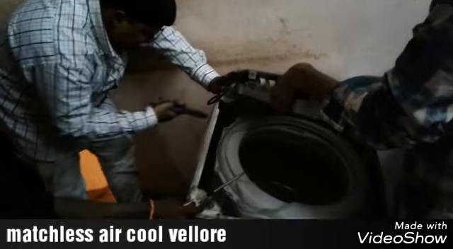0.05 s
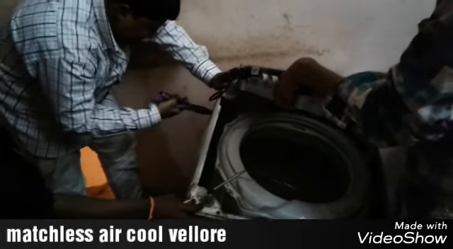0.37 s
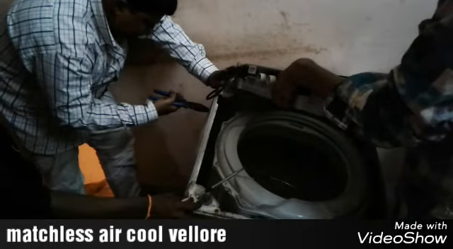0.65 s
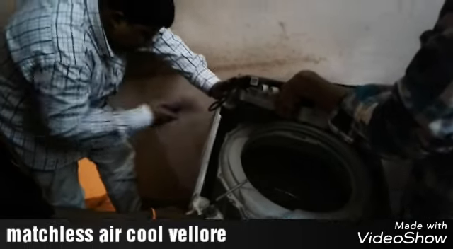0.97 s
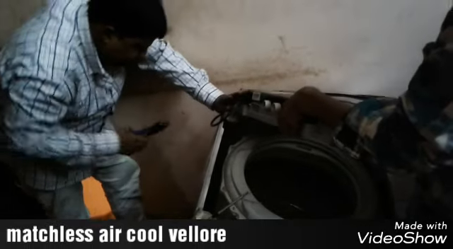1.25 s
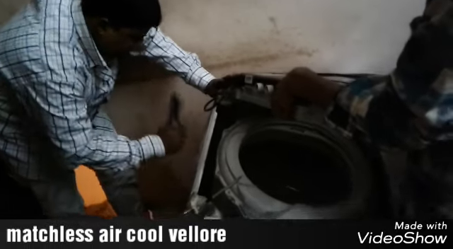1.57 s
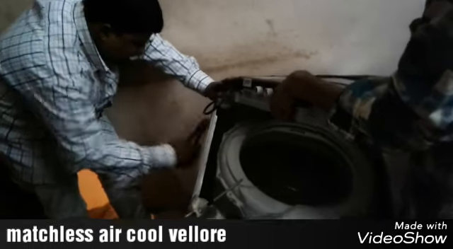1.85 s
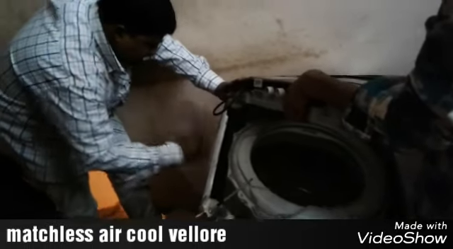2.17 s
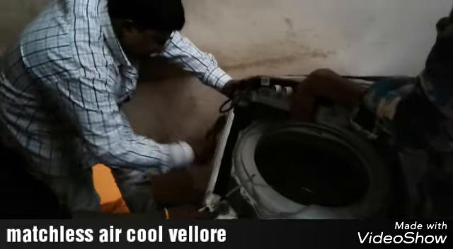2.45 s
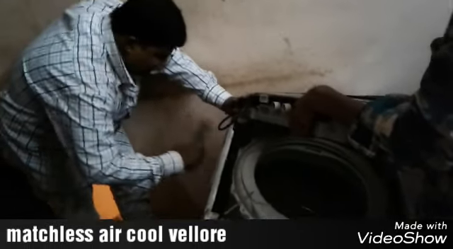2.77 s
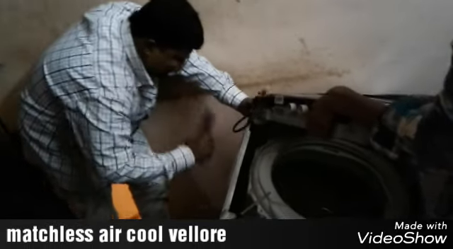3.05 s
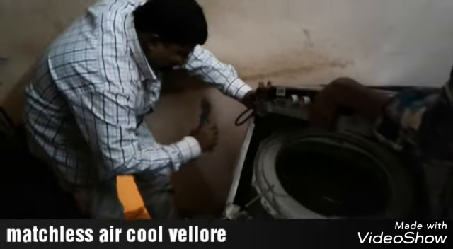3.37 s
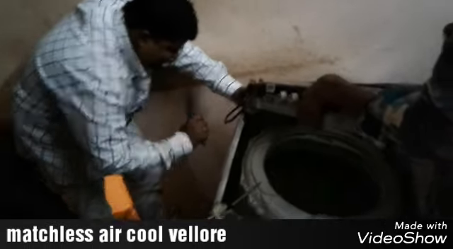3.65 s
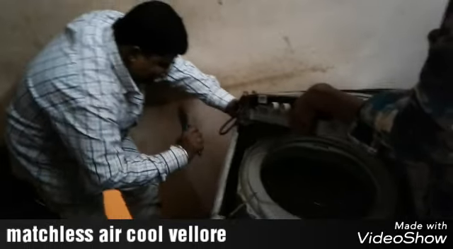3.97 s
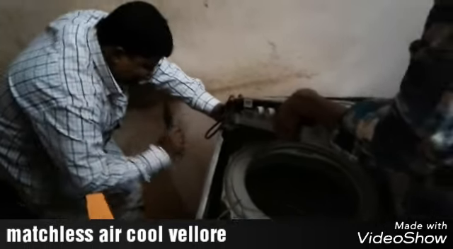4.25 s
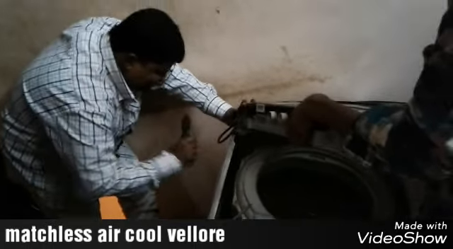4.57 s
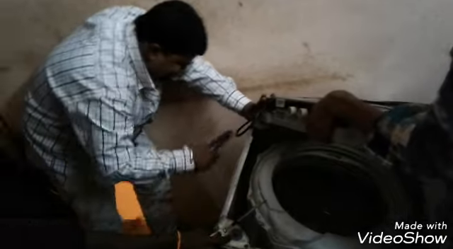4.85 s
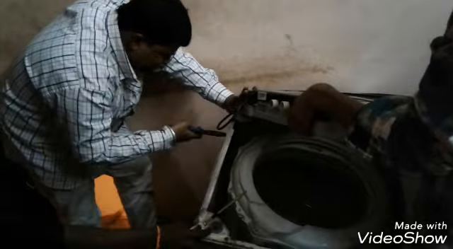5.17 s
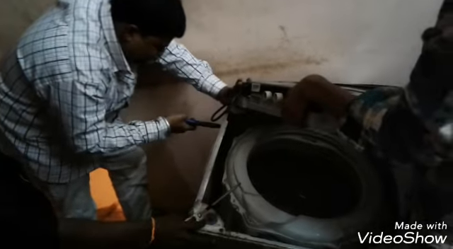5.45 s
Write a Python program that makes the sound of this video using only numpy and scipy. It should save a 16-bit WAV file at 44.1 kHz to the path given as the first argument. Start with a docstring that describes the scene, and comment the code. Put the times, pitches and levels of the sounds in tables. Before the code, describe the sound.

A steel hand tool taps lightly on a washing machine's metal cabinet, then hammers it in a gradually slowing run of ringing blows.

```python
"""A few light knocks ring on sheet metal; sleeves rustle faintly over a quiet background.
A steel hand tool is striking a washing machine's cabinet in a small bare workshop.
Thirteen hard blows follow, slowing down; each jolts the cabinet, sets its panels clattering and
booming, and rings the tool. A limiter flattens the top of every hard blow."""
import sys
import numpy as np
from scipy import signal
from scipy.io import wavfile
from scipy.ndimage import uniform_filter1d

SR = 44100
rng = np.random.default_rng(int(sys.argv[2]) if len(sys.argv) > 2 else 0)


def transcribe(signal):
    """Save signal, clipped to [-1, 1], as a 16-bit WAV file at the path in sys.argv[1]."""
    frames = np.atleast_2d(signal).T
    limited = np.clip(frames, -1, 1)
    pcm = np.round(limited * 32767).astype(np.int16)
    wavfile.write(sys.argv[1], SR, pcm)


N = 247401
AGE_S = np.arange(int(0.85 * SR)) / SR   # time since contact
BAND_EDGES_HZ = 600 * (np.geomspace(1 + 25 / 600, 1 + 15800 / 600, 34) - 1)

# knocks lining up the tool: start_s, strength_db, boom_db, edge_db
LIGHT_KNOCKS = [(-0.06, -25, 11.5, -30), (1.104, -27, 18, 15), (1.155, -27, 18.5, -20),
                (1.368, -19.5, 4.5, -11)]
# swings of equal effort, landing differently: start_s, thump_db, boom_db, edge_db
FULL_SWINGS = [(1.8221, -21, 5.5, 0.5), (2.0224, -9, -1.5, -2), (2.2004, -22, -2, -6.5),
               (2.3817, -14, 0, -3.5), (2.5864, 3, -2.5, -5), (2.8547, 4, -0.5, -2.5),
               (3.127, -8, -2, -6.5), (3.381, -4, -4.5, -7), (3.652, 7, -4, -6.5), (3.9265, 12.5, .5, -2),
               (4.2104, 11, -2, 0), (4.5167, 12, -1, -.5), (4.8505, 7, -2.5, -2.5)]
CLANG_PER_EDGE, CLANG_PER_THUMP = 0.41, 0.13   # sharp or square contact clangs more
LOSS_PER_EDGE = 0.24   # a sharp swing leaves less body
SWELL_PER_BOOM_DB = 0.018   # a booming contact builds more gradually
# all contacts: start_s, strength_db, thump_db, boom_db, clang_db, edge_db, instant_share
# thump to edge are relative to strength
BLOWS = [(start_s, strength, -2, boom, -3.5 + CLANG_PER_EDGE * edge,
          edge, 0.82 - SWELL_PER_BOOM_DB * boom)
         for start_s, strength, boom, edge in LIGHT_KNOCKS]
BLOWS += [(start_s, 0.68 - LOSS_PER_EDGE * edge, thump, boom,
           -1 + CLANG_PER_EDGE * edge + CLANG_PER_THUMP * thump, edge, 0.22 - SWELL_PER_BOOM_DB * boom)
          for start_s, thump, boom, edge in FULL_SWINGS]


def from_db(db):
    """Decibels to gain."""
    return 10 ** (np.asarray(db) / 20)


def at_hz(points, hz):
    """Interpolate (freq_hz, value) rows over log frequency."""
    freqs_hz, values = np.transpose(points)
    return np.interp(np.log(hz), np.log(freqs_hz), values)


def bands(white):
    """Yield (centre_hz, noise band); neighbours alternate between two independent noises."""
    for k, (low_hz, high_hz) in enumerate(zip(BAND_EDGES_HZ, BAND_EDGES_HZ[1:])):
        sos = signal.butter(3, [low_hz, high_hz], "band", fs=SR, output="sos")
        yield np.sqrt(low_hz * high_hz), signal.sosfilt(sos, white[k % 2])


def coloured_noise(spectrum):
    """Steady noise of the given spectrum, rms 1."""
    white = rng.standard_normal((2, N))
    out = sum(from_db(at_hz(spectrum, hz)) * band for hz, band in bands(white))
    return out / np.std(out)


def place(sounds):
    """Lay one sound per blow on the time line."""
    pad = len(AGE_S)
    out = np.zeros(N + 2 * pad)
    for (start_s, *_), sound in zip(BLOWS, sounds):
        start = pad + round(start_s * SR)
        out[start:start + len(sound)] += sound
    return out[pad:pad + N]


def drive(hz):
    """Each blow's excitation gain at hz, as a column."""
    levels_db = [strength + at_hz([(250, boom), (900, 0), (2500, clang), (6000, edge)], hz)
                 for _, strength, _, boom, clang, edge, _ in BLOWS]
    return from_db(levels_db)[:, None]


def envelope(hz, t60_s):
    """Part of a blow is instant, the rest builds as bending waves spread; all of it decays."""
    # spread through panels and room: freq_hz, time_constant_s
    spread_times = [(60, 0.0075), (300, 0.063), (1100, 0.064), (2500, 0.024), (5000, 0.0047)]
    instant_share = np.clip(np.array(BLOWS)[:, -1:], 0, 1)
    swell = 1 - (1 - instant_share) * np.exp(-AGE_S / at_hz(spread_times, hz))
    return swell * from_db(-60 * AGE_S / t60_s)


def ringing(modes, level_db, scatter_db, detune):
    """Each blow rings the modes with new levels and phases; grip and pressure shift their pitch."""
    out = 0
    for hz, mode_db, t60_s in modes:
        louder, higher, phase = rng.uniform(-1.084, 1, (len(BLOWS), 3)).T[:, :, None]
        tone = np.sin(2 * np.pi * hz * (1 + detune * higher) * AGE_S + np.pi * phase)
        gain = drive(hz) * from_db(level_db + mode_db + scatter_db * louder)
        out += gain * tone * envelope(hz, t60_s)
    return place(out)


def burst(levels_db, low_hz, high_hz, decay_s):
    """A short band of noise at each contact."""
    sos = signal.butter(2, [low_hz, high_hz], "band", fs=SR, output="sos")
    push = rng.standard_normal((len(BLOWS), len(AGE_S))) * (np.exp(-AGE_S / decay_s) + 1e-12)
    return place(from_db(levels_db)[:, None] * signal.sosfilt(sos, push))


def panel_clatter(level_db, shared_power):
    """Dense weak panel modes; blows land near one spot, so they share part of their ring."""
    # mode crowd: freq_hz, density_db
    spectrum = [(30, -38), (60, -44), (110, -12), (200, -6), (400, 0.5), (700, 1.5), (1300, 1.5),
                (2200, -5.5), (3600, -13.5), (5000, -14), (6300, -13), (8400, -30.5), (11500, -20.5),
                (15000, -31.5)]
    # its decay: freq_hz, t60_s
    ring_times = [(50, 0.94), (150, 0.62), (420, 0.62), (1100, 0.46), (2900, 0.33), (6000, 0.32),
                  (13000, 0.26)]
    shared = rng.standard_normal((2, 1, len(AGE_S)))
    own = rng.standard_normal((len(BLOWS), 2, len(AGE_S))).swapaxes(0, 1)
    white = np.sqrt(shared_power) * shared + np.sqrt(1 - shared_power) * own
    out = 0
    for hz, band in bands(white):
        gain = from_db(level_db + at_hz(spectrum, hz)) * drive(hz)
        out += gain * band * envelope(hz, at_hz(ring_times, hz))
    return place(out)


def cabinet_ring():
    """The cabinet booms in its room at its strong resonances."""
    # cabinet modes: pitch_hz, level_db, t60_s
    modes = [(97, -21.5, 0.98), (127.1, -10, 0.99), (161.5, -6.5, 0.4), (179.2, -5, 0.47),
             (241.2, -5.5, 0.89), (281.6, -0.5, 0.95), (310, -3, 0.89), (327.8, -2, 0.93), (369, 6.5, 0.27),
             (418, 3.5, 0.42), (406, -18, 0.34), (477.5, -0.5, 0.57), (483, 3, 0.56), (509, -17.5, 0.92),
             (581, 1.5, 0.68), (587, -1.5, 0.69), (635, 7, 0.54), (690, -9, 0.96), (744, -7, 0.88),
             (863, 0.5, 0.53), (873, 2.5, 0.4), (929, -11.5, 1), (1030, -22, 0.97), (1153, -14.5, 0.62),
             (1277, 0, 0.51), (1397, -0.5, 0.38), (1517, -0.5, 0.29), (1740, 5, 0.15)]
    return ringing(modes, level_db=-19, scatter_db=3, detune=0.006)


def cabinet_thump():
    """The whole cabinet jolts on contact."""
    levels_db = [strength + thump - 7 for _, strength, thump, *_ in BLOWS]
    return burst(levels_db, low_hz=68, high_hz=167, decay_s=0.016)


def tool_ring():
    """The steel tool rings brightly after contact."""
    # tool modes: pitch_hz, level_db, t60_s
    modes = [(2149, 0, .35), (2396, 1, .35), (3526, -3, .33), (4473, -4, .3), (5200, -3, .28),
             (5454, -1, .28), (5640, -1, .28), (5775, 0, .28), (6170, -2, .28), (6455, -2, .28)]
    return ringing(modes, level_db=-27, scatter_db=1, detune=0.0044)


def background(rms_db):
    """Steady, mostly low noise."""
    # noise floor: freq_hz, density_db
    spectrum = [(25, -27), (60, -5.5), (130, 3), (300, 2.5), (500, -2), (1100, -3), (2200, -11.5),
                (4400, -21.5), (6200, -15.5), (8000, -40), (12000, -40), (16000, -66)]
    return from_db(rms_db) * coloured_noise(spectrum)


def sleeve_rustle(uneven_db):
    """Cloth catches and slips, swelling with each arm move and dying as it stops."""
    # grip shifts, drawing back, winding up: peak_s, level_db, rise_s
    arm_moves = [(.11, -50, 0.2), (1.3, -39.5, 0.14), (1.5, -41, 0.25), (1.775, -44, 0.056)]
    # rubbing cloth: freq_hz, density_db
    spectrum = [(40, -1), (130, 14.5), (500, 9), (1400, 8.5), (3000, -4.5), (6200, -1.5), (8500, -26),
                (11500, -10), (15500, -30)]
    downswings = [(start_s - 0.1, -50.5, 0.13) for start_s, *_ in FULL_SWINGS]
    time_s = np.arange(N) / SR
    motion = 0
    for peak_s, level_db, rise_s in arm_moves + downswings:
        fall_s = 0.62 * rise_s
        swell = np.exp(-np.maximum((peak_s - time_s) / rise_s, (time_s - peak_s) / fall_s))
        motion += from_db(level_db) * swell
    catches = uniform_filter1d(rng.standard_normal(N), size=700)
    return motion * from_db(uneven_db * catches / np.std(catches)) * coloured_noise(spectrum)


def contact_tick():
    """Only sharp, bare steel contact ticks distinctly."""
    levels_db = [strength + 2 * edge - 15 for _, strength, *_, edge, _ in BLOWS]
    return burst(levels_db, low_hz=4400, high_hz=7500, decay_s=0.0013)


def scene():
    """Struck cabinet and tool over background and sleeves, mono."""
    impacts = contact_tick() + cabinet_thump()
    panels = panel_clatter(level_db=7.5, shared_power=0.098) + cabinet_ring()
    mix = impacts + panels + tool_ring() + background(rms_db=-48.5) + sleeve_rustle(uneven_db=1.7)
    return mix[None]


def limiter(x, ceiling_db, release_db_per_s):
    """Gain drops when the short-term level passes the ceiling, then recovers steadily."""
    level_db = 10 * np.log10(np.maximum(uniform_filter1d(x ** 2, size=220), 1e-12))
    excess_db = np.maximum(level_db - ceiling_db, 0)
    recovery_db = release_db_per_s * np.arange(N) / SR
    cut_db = np.maximum.accumulate(excess_db + recovery_db, axis=-1) - recovery_db
    return x * from_db(-uniform_filter1d(cut_db, size=90))


def record(dry):
    """Limiter, soft clip, treble cut-off."""
    clip_level, cutoff_hz = 0.95, 16650
    held = limiter(dry, ceiling_db=-10, release_db_per_s=92)
    rounded = held / (1 + (held / clip_level) ** 6) ** (1 / 6)
    return signal.sosfilt(signal.cheby2(14, 60, cutoff_hz, fs=SR, output="sos"), rounded)


dry = scene()
out = record(dry)
transcribe(out)
```